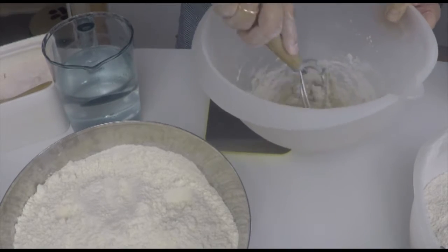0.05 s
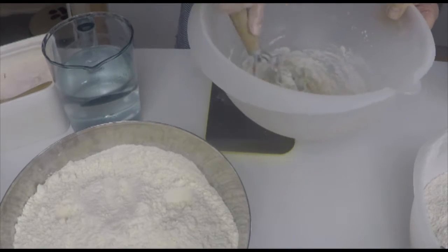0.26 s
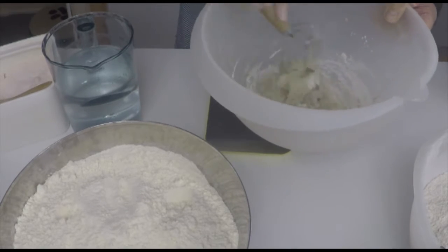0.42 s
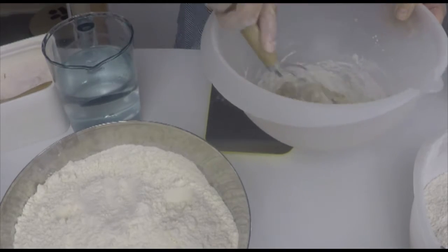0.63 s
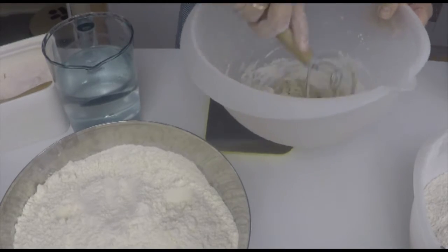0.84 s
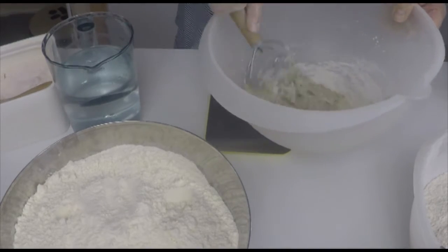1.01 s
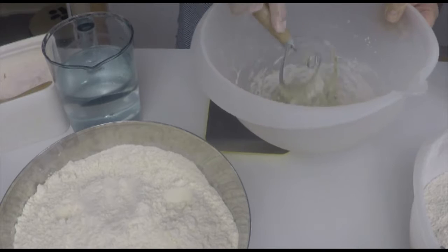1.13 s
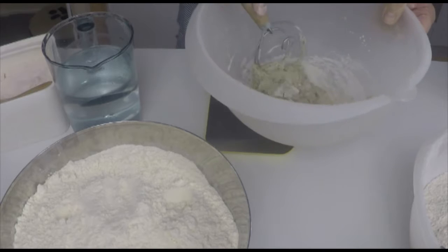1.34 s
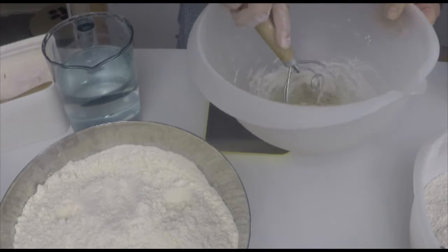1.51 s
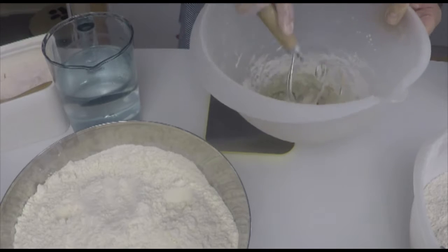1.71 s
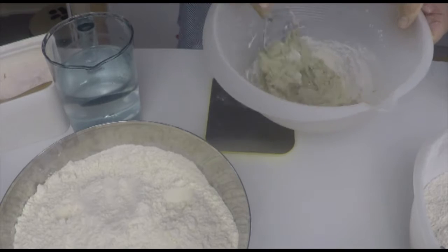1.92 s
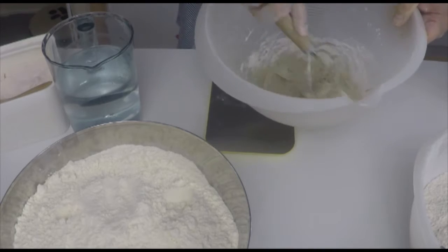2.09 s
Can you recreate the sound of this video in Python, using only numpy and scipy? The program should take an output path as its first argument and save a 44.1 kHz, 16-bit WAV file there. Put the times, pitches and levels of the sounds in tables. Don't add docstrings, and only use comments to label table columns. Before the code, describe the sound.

Close in a small kitchen, whisk wires rasp and knock a plastic bowl in uneven strokes, pause, tick and squeak briefly, then scrape steadily again; a small recorder with heavy noise removal leaves the gaps very quiet.

```python
import sys
import numpy as np
from scipy import signal
from scipy.io import wavfile
from scipy.ndimage import uniform_filter1d

SR = 44100
rng = np.random.default_rng(int(sys.argv[2]) if len(sys.argv) > 2 else 0)


def wav_record(signal):
    frames = np.transpose(np.atleast_2d(signal))
    bounded = np.clip(frames, -1, 1)
    quanta = np.round(bounded * 32767).astype(np.int16)
    wavfile.write(sys.argv[1], SR, quanta)


def decibels_to_gain(level_db):
    exponent = np.asarray(level_db, float) / 20
    return 10 ** exponent


N = 94815


def rms_one(x):
    return x / np.sqrt(np.mean(x ** 2) + 1e-20)


def in_time(rows):
    s, *columns = np.transpose(rows)
    return [np.interp(np.arange(N) / SR, s, c) for c in columns]


def band(x, low_hz, high_hz, order=2):
    edges_hz = [low_hz, min(high_hz, .45 * SR)]
    return signal.sosfilt(signal.butter(order, edges_hz, "band", fs=SR, output="sos"), x)


def noise():
    return rng.standard_normal(N)


def drift(rate_hz):
    step = 40
    r = np.exp(-2 * np.pi * rate_hz * step / SR)
    chance = rng.standard_normal(N // step + 2002)
    slow = signal.lfilter([1], [1, -2 * r, r * r], chance)[2000:]
    return np.interp(np.arange(N) / step, np.arange(len(slow)), rms_one(slow))


def ring(clicks, hz, t60_s):
    r, w = decibels_to_gain(-60 / (t60_s * SR)), 2 * np.pi * hz / SR
    return signal.lfilter([0, np.sin(w)], [1, -2 * r * np.cos(w), r * r], clicks + 1e-18)


def decay(clicks, t60_s):
    return signal.lfilter([1], [1, -decibels_to_gain(-60 / (t60_s * SR))], clicks)


def clicks_at(s, size):
    out = np.zeros(N)
    np.add.at(out, np.minimum((np.asarray(s) * SR).astype(int), N - 1), size)
    return out


def slips():
    slips_per_s, spread_db = 2900, 1.36
    sizes = decibels_to_gain(spread_db * np.minimum(rng.exponential(1, N), 4)) * rng.choice([-1, 1], N)
    return rms_one(sizes * (rng.random(N) < slips_per_s / SR) + 0.19 * noise())


# start_s, rubbing_db, wall_pressure_db, bowl_shaking_db
EARLY_STROKES = [
    [(0.0, -41.5, -1, 10.5), (0.014, -41, 1.5, -4), (0.06, -51.5, -2.5, -8), (0.18, -59.5, -12, -2.5),
     (0.2, -61.5, 9.5, 6)],
    [(0.2, -65.5, -13.5, 11.5), (0.21, -49, 4, -2), (0.32, -44.5, 4, 3.5), (0.436, -60.5, -2, -36),
     (0.614, -67.5, -12.5, -0.5), (0.66, -69, -29, -18)],
    [(0.66, -72.5, -19, -6), (0.686, -57, -45.5, -1.5), (0.742, -60, -27.5, -9), (0.788, -65.5, -36.5, -9),
     (0.872, -77.5, -5.5, -26), (0.97, -71, -37, 2)],
]
# start_s, rubbing_db, wall_pressure_db, bowl_shaking_db
LATE_STROKES = [
    [(0.97, -69, -28.5, 0), (1.004, -51.5, -54.5, 1), (1.038, -54, -23, -22), (1.084, -48.5, -3, 10),
     (1.208, -50, 0.5, -18.5), (1.342, -65, -6, -8.5), (1.402, -70, -8.5, -15), (1.44, -69, -16.5, -25)],
    [(1.44, -66, -18.5, -23), (1.522, -72, -8.5, -40), (1.532, -69, -14.5, -29), (1.614, -71.5, -9.5, -9),
     (1.63, -65, -9.5, 8), (1.682, -37.5, -23.5, -9), (1.692, -43, -16, -7), (1.72, -49.5, -11, 15)],
    [(1.72, -44, -6.5, -5), (1.75, -47, -3, -4.5), (1.838, -51, 2, -6), (1.89, -42, -3, 1),
     (1.942, -58, 4.5, -3), (1.962, -46, -2.5, -0.5), (2.066, -49.5, 0, -4), (2.15, -46, 1, 11)],
]


def strokes():
    return in_time([row for stroke in EARLY_STROKES + LATE_STROKES for row in stroke])


def earlier():
    start_db, t60_s = -46.5, 0.35
    fall_db = 60 * np.arange(N) / SR / t60_s
    return decibels_to_gain(start_db - fall_db) * rms_one(band(noise(), 410, 1165))


# start_s, peak_db
KNOCKS = [(0.212, -1), (0.302, -28.5), (0.965, -20.5), (0.987, -41), (1.051, -35), (1.084, -26),
          (1.102, -37), (1.199, -34.5), (1.58, -46.5), (1.594, -17.5), (1.715, -51), (1.742, -31.5),
          (1.777, -31.5), (1.854, -47), (1.87, -43), (1.9, -31), (1.973, -70), (1.992, -28), (2.005, -28.5),
          (2.056, -38), (2.086, -52), (2.119, -24.5), (2.139, -22.5)]
# pitch_hz, level_db, t60_s
BOWL_MODES = [(354, -35, 0.16), (394, -11.5, 0.25), (418.6, 0, 0.091), (450.3, -0.5, 0.21),
              (495.9, 2.5, 0.13), (489.7, -28.5, 0.14), (614, -20.5, 0.54)]


def bowl(shaking_db):
    knock_db, lead_s, spread_db = -13.5, .0022, 1.47
    soft_is_dull = 2.4
    s, db = np.transpose(KNOCKS)
    soft = db < -15
    s, db = np.append(s, s[soft] - .0048), np.append(db, db[soft] - 4.5)
    softness_db = np.clip(db - 0.5, -20, 0)
    shaking, struck = 0, 0
    for hz, level_db, t60_s in BOWL_MODES:
        shaking = shaking + decibels_to_gain(level_db) * ring(noise(), hz, t60_s)
        dull_db = soft_is_dull * softness_db * np.log2(hz / 410)
        hit_db = db + level_db + knock_db + dull_db + rng.normal(0, spread_db, len(s))
        struck = struck + ring(clicks_at(s - lead_s, decibels_to_gain(hit_db)), hz, t60_s)
    shaken = decibels_to_gain(shaking_db + 1.5 * drift(25)) * rms_one(shaking)
    return band(struck + shaken, 328.7, 585, order=4)


# pitch_hz, width_hz, level_db
WALL_MODES = [(941, 51, 2), (1157, 58, -7.5), (1508, 27, 1), (1646, 69, 2.5), (1871, 180, 7),
              (2084, 110, 5.5), (2320, 70, 5), (2605, 230, 1.5), (2931, 42, 5)]


def wall(level_db):
    flat_db, surge_db = -3.5, 2.2
    drive, rings = slips(), 0
    for k, (hz, width_hz, db) in enumerate(WALL_MODES):
        mode = decibels_to_gain(db + 1.9 * drift(1.6)) * rms_one(ring(drive, hz, 5.2 / width_hz))
        rings = rings + mode * (-1) ** k
    resonant = rms_one(band(rings, 1150, 3000, order=5))
    flat = decibels_to_gain(flat_db) * rms_one(band(slips(), 1174, 3030, order=4))
    return decibels_to_gain(level_db + surge_db * drift(15)) * rms_one(resonant + flat)


# pitch_hz, level_db (per Hz)
HISS_COLOUR = [(1470, -32), (2500, -2), (2720, -7.5), (3540, -5.5), (8090, -8.5), (10700, -12.5),
               (12000, -14), (15600, -52), (22000, -120)]


def hiss(level_db, press_db):
    light_touch_thins = 0.87
    at_hz, colour_db = np.transpose(HISS_COLOUR)
    edges_hz = 2600 * 2 ** np.arange(0, 2.4, 1 / 8)
    drives, shared = [slips(), slips()], drift(40)
    lightness_db = np.clip(press_db, -30, 0)
    out = 0
    for k, (low, high) in enumerate(zip(edges_hz, edges_hz[1:])):
        band_db = np.interp(np.log(low * 1.086), np.log(at_hz), colour_db)
        thin_db = light_touch_thins * lightness_db * max(1 - low / 6500, 0)
        patchy_db = 4.34 * drift(7.9) + 0.73 * shared
        out = out + decibels_to_gain(band_db + thin_db + patchy_db) * band(drives[k % 2], low, high)
    return decibels_to_gain(level_db) * rms_one(band(out, 2750, 16000, order=6))


# start_s, length_s, pitch_hz, level_db
SINGING_PATCHES = [(0, 0.053, 1770, -48), (0, 0.032, 950, -56.5), (0.253, 0.042, 2910, -46),
                   (0.257, 0.022, 4700, -50), (0.28, 0.025, 1890, -43.5), (0.286, 0.011, 2450, -49),
                   (0.298, 0.014, 1670, -46.5), (0.301, 0.037, 2750, -43), (0.307, .03, 498.2, -37),
                   (0.989, 0.043, 3506, -52), (1.011, .08, 4150, -56.5), (1.046, 0.11, 881, -55.5),
                   (1.056, 0.039, 2240, -53), (1.071, 0.11, 2280, -43), (1.096, 0.05, 5380, -54.5),
                   (1.072, .075, 1187, -51.5), (1.122, 0.018, 1654, -46.5), (1.133, .024, 2070, -51),
                   (1.137, 0.02, 1683, -47), (1.199, 0.029, 2390, -47.5), (1.2, 0.016, 1640, -56),
                   (1.236, .028, 1670, -53.5), (1.257, 0.18, 2373, -67), (1.396, 0.07, 2570, -64),
                   (1.578, .06, 686, -65), (1.566, 0.106, 974, -62.5), (1.593, .05, 1480, -62),
                   (1.569, 0.057, 1650, -58), (1.582, 0.041, 2370, -78.5), (1.572, 0.062, 3880, -70.5),
                   (1.728, 0.021, 3870, -50.5), (1.733, 0.032, 1900, -48), (1.744, 0.0276, 2290, -40.5),
                   (1.746, 0.012, 4180, -55), (1.799, 0.023, 3090, -43.5), (1.8, 0.024, 2470, -42.5),
                   (1.854, 0.011, 2700, -49), (1.866, 0.036, 2360, -38), (1.869, 0.051, 2675, -38),
                   (1.886, 0.032, 2025, -41), (1.888, 0.013, 3880, -39.5), (1.956, .026, 2360, -41.5),
                   (1.961, 0.035, 1864, -44), (1.999, 0.041, 2170, -46.5), (1.999, 0.06, 1723, -46.5),
                   (2.025, 0.036, 610, -53), (2.057, 0.038, 1730, -50), (2.122, 0.014, 2750, -50),
                   (2.13, 0.036, 1647, -41.5), (2.133, 0.018, 3410, -44)]


def sings():
    cycles = 70
    drive, t, out = slips(), np.arange(N) / SR, np.zeros(N)
    for s, length_s, hz, db in SINGING_PATCHES:
        on = (t >= s) & (t < s + length_s)
        patch = band(ring(drive, hz, cycles / hz), .8 * hz, 1.25 * hz)
        passing = np.sin(np.pi * (t[on] - s) / length_s)
        out[on] += decibels_to_gain(db) * passing * rms_one(patch[on])
    return out


def kitchen(x):
    t60_s, rise_s, cut_hz = 0.79, 0.0067, 7200
    t = np.arange(SR) / SR
    tail = rng.standard_normal((2, SR)) * decibels_to_gain(-60 * t / t60_s) * np.clip(t / rise_s, 0, 1)
    tail = signal.lfilter([1], [1, -np.exp(-2 * np.pi * cut_hz / SR)], tail)
    tail /= np.sqrt(np.sum(tail ** 2, axis=1, keepdims=True))
    return signal.fftconvolve(x[None], tail, axes=1)[:, :N]


def room_air():
    return decibels_to_gain(-84 + 5 * drift(2.1)) * rms_one(band(noise(), 8600, 12000))


def rumble():
    start_db, fade_db_per_s, lumps_db = -70.5, 21, 4
    level_db = start_db - fade_db_per_s * np.arange(N) / SR + lumps_db * drift(4.3)
    return decibels_to_gain(level_db) * rms_one(band(noise(), 6.9, 49))


def slap():
    slap_db, thud_db, hardness = -38.5, -47.5, 1.9
    s, db = np.transpose([knock for knock in KNOCKS if knock[1] > -15])
    clicks = clicks_at(s - .002, decibels_to_gain(hardness * db))
    slapped = decay(clicks, .45) * rms_one(band(noise(), 650, 1900))
    thud = decay(clicks, .5) * rms_one(band(noise(), 170, 293.8))
    return decibels_to_gain(slap_db) * slapped + decibels_to_gain(thud_db) * thud


# start_s, extra_db
CATCHES = [(0.262, 2.5), (.292, 0), (0.31, 3.5), (1.143, 7.5), (1.756, 2.5), (1.807, 4.5), (1.88, 2.5),
           (1.895, 3), (2.012, 3)]


def catches():
    width_s, t = .006, np.arange(N) / SR
    return sum(db * np.exp(-.5 * ((t - s) / width_s) ** 2) for s, db in CATCHES)


# start_s, length_s, pitch_hz, level_db
WIRE_RINGS = [(.68, .055, 3630, -64), (.72, .07, 3650, -73), (.695, .08, 2390, -73), (.68, .06, 4250, -68),
              (.68, .07, 5500, -69), (1.59, .06, 2915, -64)]


def wire_rings():
    t, out = np.arange(N) / SR, np.zeros(N)
    for s, length_s, hz, db in WIRE_RINGS:
        swell = np.sin(np.pi * np.clip((t - s) / length_s, 0, 1))
        tone = np.sin(2 * np.pi * hz * t + .5 * drift(20))
        out += decibels_to_gain(db + 2.5 * drift(30)) * swell * tone
    return out


# start_s, peak_db, pitch_hz
TICKS = [(0.75, -43, 8700), (0.9878, -34, 9150), (0.993, -30.5, 8000), (1.0017, -31.5, 3900),
         (1.0024, -25.5, 9300), (1.0074, -28.5, 3860), (1.0066, -33, 7600), (1.0264, -36, 9400),
         (1.031, -37.5, 7750), (1.534, -44, 11000), (1.544, -49.5, 10800), (1.633, -39, 5000),
         (1.6385, -36.5, 5900), (1.654, -32.5, 6300), (1.6742, -28.5, 2920), (1.6815, -36, 4330),
         (1.658, -54, 5930), (1.673, -23, 8560), (1.6778, -23, 7260), (1.678, -27.5, 6500),
         (1.6808, -22, 7400), (1.959, -37, 4660)]


def ticks():
    tick_db, crack_db, cycles = 2.2, -13, 20
    rings = np.zeros(N)
    for s, db, hz in TICKS:
        rings += ring(clicks_at([s], decibels_to_gain(db + tick_db)), hz, cycles / hz)
    s, db, _ = np.transpose(TICKS)
    crack = decay(clicks_at(s, decibels_to_gain(db + crack_db)), 0.0019) * noise()
    return band(rings, 3160, 13600, order=6) + band(crack, 3800, 14000, order=4)


# start_s, pitch_hz, level_db
SQUEAK = [(1.44, 2925, -80), (1.46, 2935, -51), (1.482, 2926, -46), (1.5, 2926, -50), (1.518, 2910, -70),
          (1.528, 2950, -53), (1.56, 2920, -46), (1.576, 2880, -62), (1.64, 2900, -68)]


def squeak():
    hz, db = in_time(SQUEAK)
    t = np.arange(N) / SR
    on = (t > SQUEAK[0][0]) & (t < SQUEAK[-1][0])
    tone = np.sin(2 * np.pi * np.cumsum(hz + 9 * drift(43)) / SR)
    return np.sqrt(2) * on * decibels_to_gain(db + 1.5 * drift(40)) * tone


def scene():
    room_db, lean_db = -20, -0.5
    rub_db, press_db, shake_db = strokes()
    low = bowl(rub_db + shake_db)
    rub_db = rub_db + catches()
    middle = wall(rub_db + np.minimum(press_db, 10)) + slap() + earlier()
    high = hiss(rub_db, press_db) + ticks() + squeak() + wire_rings()
    tail = kitchen(low + 0.031 * (middle + high))
    middle = middle + sings()
    mid = middle + high + room_air() + decibels_to_gain(room_db) * tail[0]
    side = decibels_to_gain(-14) * np.roll(low, 25)
    side = side + decibels_to_gain(-14) * band(np.roll(middle, 40), 500, 1900)
    side = side + decibels_to_gain(-33) * np.roll(high, 31) + decibels_to_gain(room_db - 10) * tail[1]
    leaning = low * decibels_to_gain(np.array([[lean_db], [-lean_db]]))
    return mid + leaning + side * [[1], [-1]] + rumble() * decibels_to_gain(np.array([[-4], [3]]))


def roll_off(x):
    return signal.sosfilt(signal.butter(12, 12860, fs=SR, output="sos"), x)


# pitch_hz, level_db
GATE_THRESHOLD = [(60, -120), (250, -112), (800, -105), (2000, -100), (4000, -96), (8000, -98),
                  (11800, -99)]
# pitch_hz, width_hz, extra_db
LEARNED_NOISE = [(3350, 240, 13), (4400, 200, 12), (4950, 70, 10), (2650, 90, 8)]


def record(dry):
    ripple_db, depth_db, cutoff_hz, above_cutoff_db = 9.5, -35, 11950, -36
    hz, _, z = signal.stft(dry, SR, nperseg=1024, noverlap=768)
    power = uniform_filter1d(np.mean(abs(z) ** 2, axis=0), size=9, axis=1)
    ripple = uniform_filter1d(rng.standard_normal(power.shape), size=40, axis=1)
    ripple = rms_one(uniform_filter1d(ripple, size=3, axis=0))
    at_hz, db = np.transpose(GATE_THRESHOLD)
    limit_db = np.interp(np.log(hz + 1), np.log(at_hz), db)
    for mid_hz, width_hz, extra_db in LEARNED_NOISE:
        limit_db = limit_db + extra_db * np.exp(-((hz - mid_hz) / width_hz) ** 4)
    limit = decibels_to_gain(2 * (limit_db[:, None] + ripple_db * ripple))
    gain = np.maximum(power ** 3 / (power ** 3 + limit ** 3), decibels_to_gain(depth_db))
    gain = gain * np.where(hz > cutoff_hz, decibels_to_gain(above_cutoff_db), 1)[:, None]
    clean = signal.istft(z * gain, SR, nperseg=1024, noverlap=768)[1][:, :N]
    return roll_off(clean)


dry = scene()
out = record(dry)
wav_record(out)
```